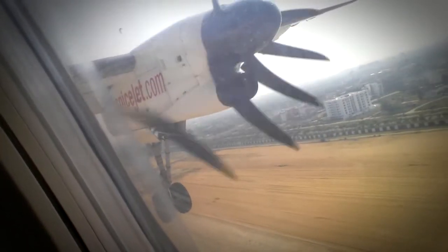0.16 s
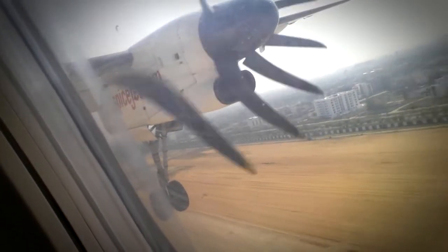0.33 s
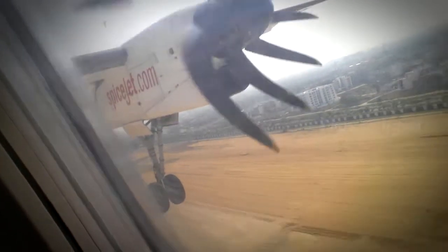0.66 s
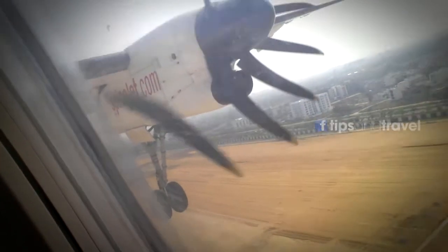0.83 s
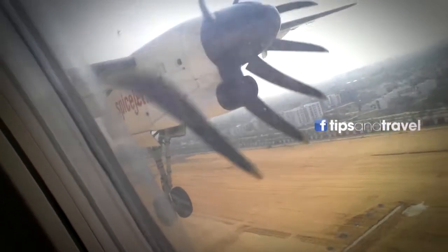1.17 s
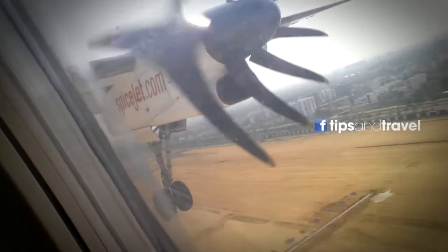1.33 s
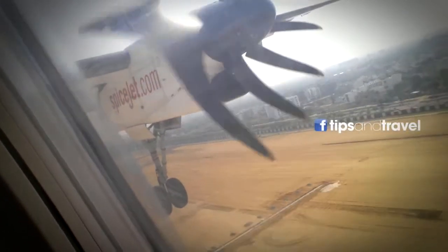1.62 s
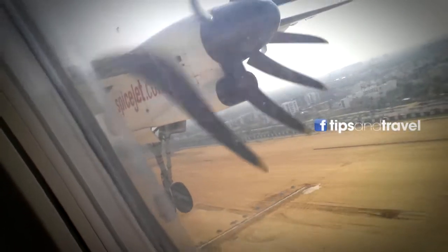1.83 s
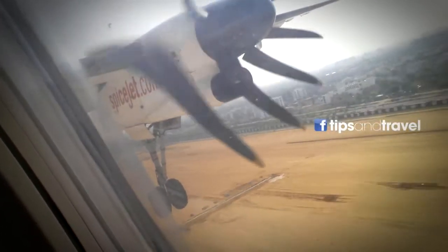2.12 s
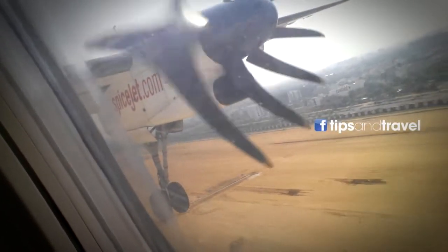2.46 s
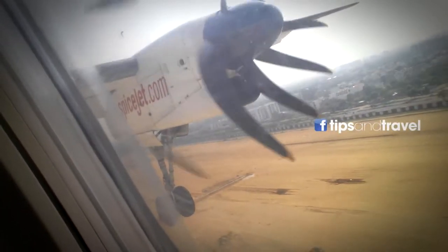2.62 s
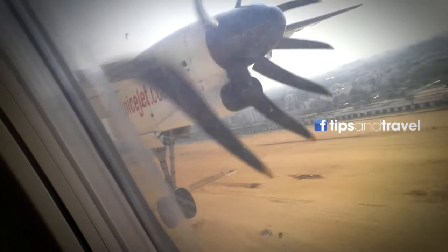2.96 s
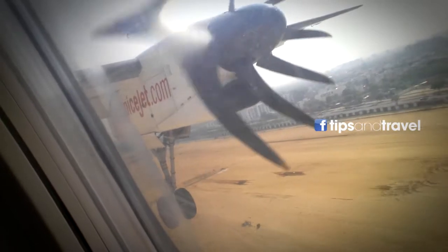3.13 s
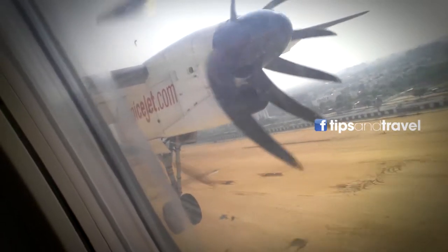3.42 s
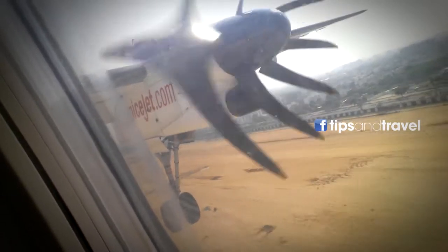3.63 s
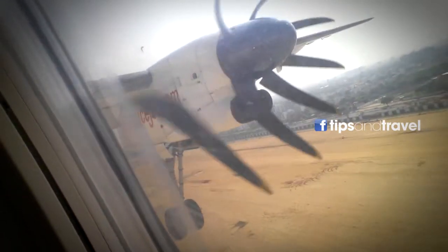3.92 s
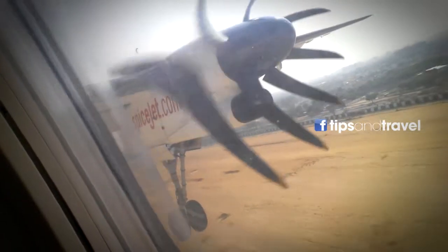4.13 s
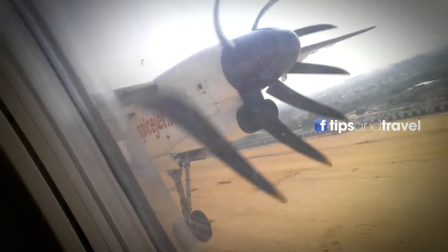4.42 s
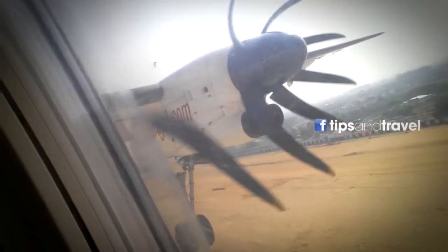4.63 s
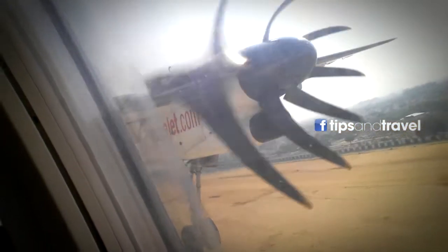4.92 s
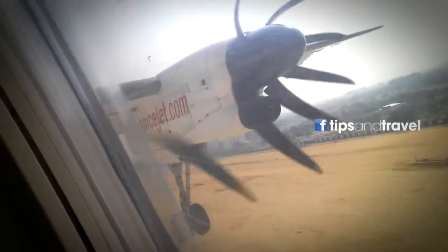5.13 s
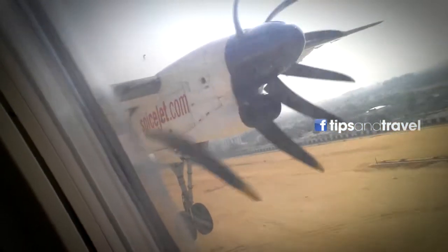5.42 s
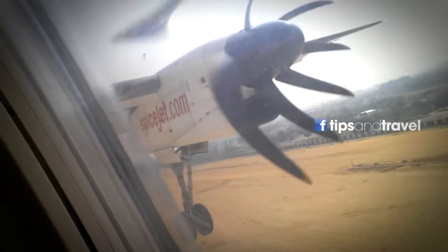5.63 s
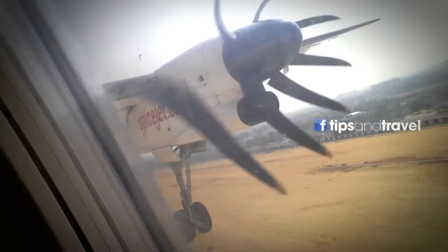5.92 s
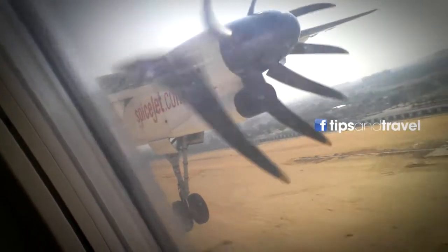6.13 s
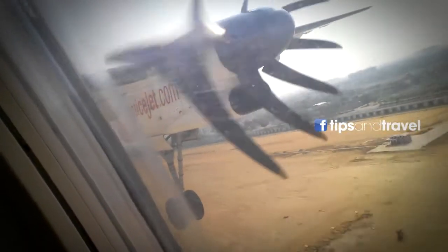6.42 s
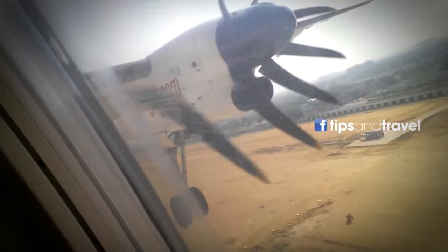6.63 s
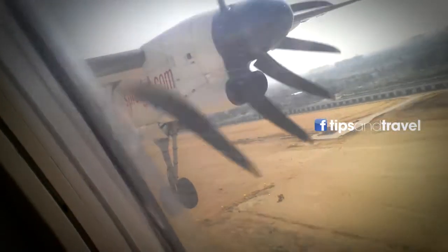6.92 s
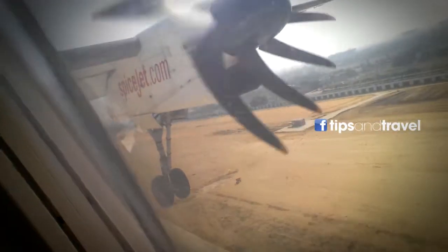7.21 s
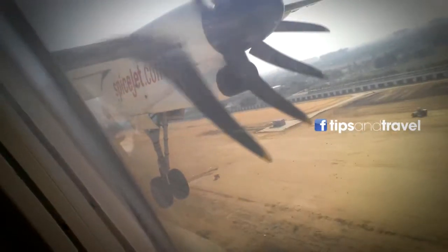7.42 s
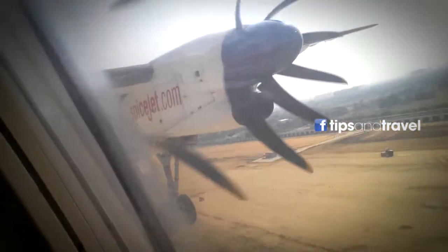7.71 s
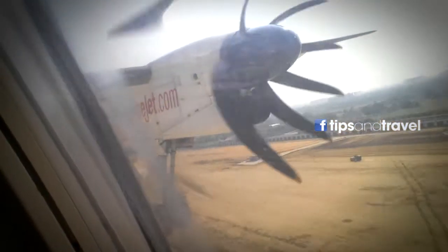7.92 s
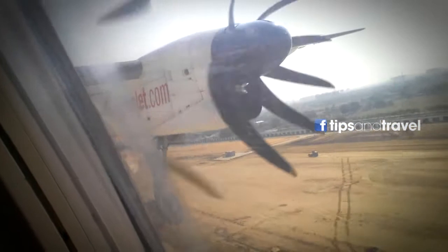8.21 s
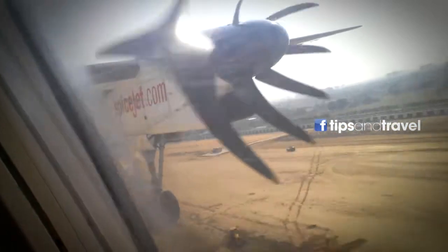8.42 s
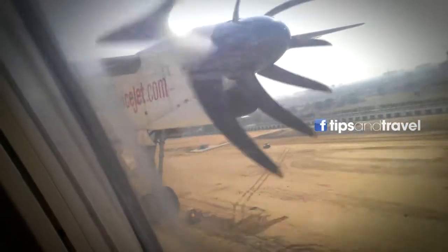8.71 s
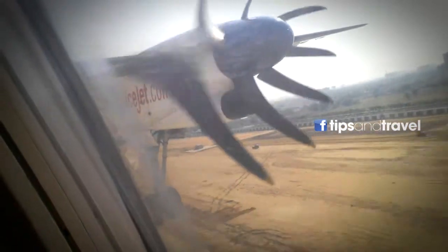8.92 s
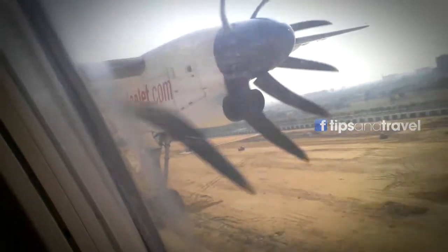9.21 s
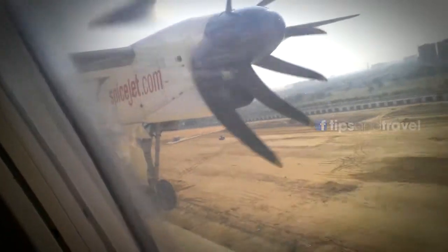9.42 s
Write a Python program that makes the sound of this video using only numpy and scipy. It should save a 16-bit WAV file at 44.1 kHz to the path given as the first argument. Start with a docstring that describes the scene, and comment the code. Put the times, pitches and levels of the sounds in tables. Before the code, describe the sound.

From 0 s, the inside of a turboprop cabin near a window: a loud, very deep propeller drone at about a hundred hertz, with fainter wavering hums, low hull rumble and muffled rushing air. High above runs a thin, piercing turbine whine around six kilohertz, roughened by the blade beat and leaning right, with fine hiss. A faint rub passes near 1.7 s and a tiny tick at 2.9 s. From 4.3 s a second turbine's whine creeps up slightly in pitch. A click at 4.4 s and a tight cluster of hard plastic taps at 4.9-5.2 s come from handling the camera. Around 6-7 s the drone dips and flutters, and the whine becomes smoother and fuller. After a tap at 6.6 s, grainy, buzzing rubs against trim run from 6.7 to 7.3 s with stronger air. The drone then recovers and continues, weakening at 9.5 s without stopping.

```python
"""Propeller blades beat on the hull of a turboprop, heard from the cabin with a hand-held camera at the window.
The beat is steady sines that drift in level and phase, with overtones, a gear tone and wavering hums.
Two turbines whine above it as tones chopped at each blade pass; one engine spools up towards the other.
The camera ticks as cracks that ring its case, and brushes the trim as grainy, buzzing noise.
Behind lie low rumble, air rush and hiss, all shaped stereo noise."""
import sys
import numpy as np
from scipy import signal
from scipy.fft import rfft, irfft, next_fast_len
from scipy.io import wavfile
from scipy.ndimage import uniform_filter1d, map_coordinates

SR = 44100
rng = np.random.default_rng(int(sys.argv[2]) if len(sys.argv) > 2 else 0)


def master_out(mix):
    """Clip the mix to full scale and print it as 16-bit PCM to the path in sys.argv[1]."""
    frames = np.transpose(np.atleast_2d(mix))
    ceiling = np.clip(frames, -1, 1)
    pcm = np.round(ceiling * 32767).astype(np.int16)
    wavfile.write(sys.argv[1], SR, pcm)


N = 421596
NOW = np.arange(N) / SR  # time of each sample, s
BLADE_HZ = 102.0  # blade passes a second
SPOOL_START_S = 4.3  # the far engine begins to spool up
TURN_START_S, TURN_END_S = 5.75, 6.75  # the camera turns a little from the window


def amp(db):
    """Decibels to an amplitude factor."""
    return 10 ** (np.asarray(db) / 20)


def unit(x):
    """Scale to rms 1."""
    return x / np.sqrt(np.mean(x ** 2) + 1e-20)


def along(points, hz):
    """Interpolate (Hz, value) points on a log frequency axis."""
    point_hz, value = np.transpose(points)
    return np.interp(np.log(hz + 1), np.log(point_hz + 1), value)


def curve(rows):
    """Interpolate (s, value) rows to one value per sample."""
    s, value = np.transpose(rows)
    return np.interp(NOW, s, value)


def turned(before, after):
    """A value that glides from before to after while the camera turns."""
    return np.interp(NOW, [TURN_START_S, TURN_END_S], [before, after])


def swell(centre_s, half_s):
    """A bell-shaped rise to 1, down to 1/e at half_s from its centre."""
    return np.exp(-((NOW - centre_s) / half_s) ** 2)


def wobble(rate):
    """A smooth random curve, rate knots a second."""
    coarse = np.arange(0, N + 32, 32)
    knots = rng.standard_normal(int(N * rate / SR) + 4)
    return np.interp(np.arange(N), coarse, map_coordinates(knots, [coarse * rate / SR]))


def gliding_sine(hz):
    """A sine that follows a frequency curve by summing its phase."""
    return np.sin(2 * np.pi * np.cumsum(hz) / SR)


def filtered(x, response):
    """Multiply the spectrum of x by a response of frequency."""
    m = next_fast_len(N + 8192)
    return irfft(rfft(x, m) * response(np.fft.rfftfreq(m, 1 / SR)), m)[..., :N]


def coloured(spectrum):
    """Gain of a (Hz, dB) spectrum, shut outside its ends."""
    return lambda hz: amp(along(spectrum, hz)) * (hz > spectrum[0][0]) * (hz < spectrum[-1][0])


def patches(shape, bins, frames):
    """A smooth random field over frequency and time, rms 1."""
    across_hz = uniform_filter1d(rng.standard_normal(shape), bins, -2)
    return unit(uniform_filter1d(across_hz, frames, -1))


def rush(spectrum, patchy_db):
    """Stereo noise of one colour with patches of random gain, its left-right mean at rms 1."""
    # how alike the two microphones hear noise: hz, correlation
    likeness = [(30, .999), (100, .975), (260, .94), (370, .88), (530, .74), (760, .72), (1090, .02),
                (1560, -.26), (2240, 0), (6650, -.1), (9500, 0)]
    # balance of the two microphones: hz, left_minus_right_db
    lean = [(190, 1.4), (440, 2), (590, -3), (1050, -4), (1390, -.5), (1860, 2), (3290, .5), (4370, -1),
            (5820, -6.5), (7750, -11), (10300, -19.5), (12500, -10)]
    z = signal.stft(rng.standard_normal((2, N), dtype=np.float32), nperseg=512)[2]
    gain = amp(patchy_db * patches(z.shape[1:], bins=6, frames=14))
    pair = signal.istft(z * gain, nperseg=512)[1]
    m = next_fast_len(N + 8192)
    hz = np.fft.rfftfreq(m, 1 / SR)
    # mid and side shares that give the wanted correlation
    angle = np.arccos(along(likeness, hz)) / 2
    mid, side = rfft(pair, m) * coloured(spectrum)(hz) * [np.cos(angle), np.sin(angle)]
    balance = amp(along(lean, hz) * [[.5], [-.5]])
    both = irfft([mid + side, mid - side] * balance, m)[:, :N]
    return both / np.std(both.mean(0))


def propeller():
    """Blade passes and hums as sines; turbulence lets level and phase drift."""
    # blade tone as the camera moves through the cabin's standing wave: time_s, level_db
    blade_levels = [(0, -12), (.7, -10), (1.5, -10.5), (2.1, -9), (3.6, -13), (4.1, -12), (4.35, -11.5),
                    (4.85, -8), (5.4, -10), (6.0, -14.5), (6.2, -20), (6.5, -12.5), (6.78, -20.5),
                    (7.3, -11), (7.5, -15.5), (8.25, -9), (9.35, -10), (9.56, -19)]
    # higher blade harmonics: multiple of the blade rate, level_db
    overtones = [(3, -37), (4, -45), (5, -49), (6, -50)]
    # a wavering low hum: time_s, level_db
    hum_levels = [(0, -27), (1.2, -28.5), (3.3, -36), (3.8, -29.5), (5, -39), (7.3, -31.5), (9, -27.5),
                  (9.56, -37)]
    # fainter wavering hums, one swell each: pitch_hz, level_db, swell_s, half_length_s, swell_gain_db
    drones = [(309.3, -46.5, 6.85, 0.15, 18), (338.5, -39, 4, 1, 1.5), (581.6, -47.5, 8.2, 1.6, 4),
              (720, -52.5, 2.4, 1.2, 2), (817, -58.5, 5.8, 1.1, 10.5)]
    gear_hz, hum_hz = 963.6, 182
    phase = 2 * np.pi * BLADE_HZ * NOW + 0.58 * wobble(1.5)
    tone = amp(curve(blade_levels) + 0.66 * wobble(7)) * np.sin(phase)
    second_db = -31 + 9.3 * swell(6.37, half_s=0.53)
    tone += amp(second_db + 2.7 * wobble(4)) * np.sin(2 * phase + 0.48 * wobble(2.46))
    for multiple, db in overtones:
        tone += amp(db + 2.7 * wobble(3.4)) * np.sin(multiple * phase + 1.02 * wobble(3))
    # the gear tone steps down when the far engine starts to spool up
    gear_db = np.where(NOW < SPOOL_START_S, -52.5, -57.5)
    tone += amp(gear_db + 1.2 * wobble(3.4)) * np.sin(2 * np.pi * gear_hz * NOW)
    tone += amp(curve(hum_levels) + 2.5 * wobble(2.1)) * gliding_sine(hum_hz + 2.59 * wobble(3))
    for hz, db, swell_s, half_s, gain_db in drones:
        drone_db = db + gain_db * swell(swell_s, half_s) + 3 * wobble(2.3)
        tone += amp(drone_db) * gliding_sine(hz + 7 * wobble(5))
    # the two microphones sit a little apart in the wave
    apart = round(.00012 * SR)
    pair = np.array([np.roll(tone, apart), np.roll(tone, -apart)])
    return np.sqrt(2) * pair * amp([[.75], [-.75]])


def comb(hz, passed, sharp, fade_db, drift):
    """A turbine tone chopped at each blade pass; each line has a slowly changing path to each microphone."""
    # a sharp of 0 leaves the tone whole; towards 1 it leaves only a narrow pulse per blade pass
    chop = (1 - sharp ** 2) / (1 - 2 * sharp * np.cos(2 * np.pi * BLADE_HZ * NOW) + sharp ** 2)
    tone = gliding_sine(hz + .7 * wobble(5))
    bins, _, z = signal.stft(chop * tone, SR, nperseg=2048)
    gain = coloured(passed)(bins)
    used = gain > 0
    z = z[used] * gain[used, None]
    # the window delays the side lines, which turns part of the chopping into a flutter of pitch
    lines_away = (bins[used, None] - hz.mean()) / BLADE_HZ
    z = z * np.exp(1j * .8 * lines_away ** 2)
    shape = (2,) + z.shape
    fade = amp(fade_db * patches(shape, bins=3, frames=25))
    path = fade * np.exp(1j * drift * patches(shape, bins=3, frames=70))
    heard = np.zeros((2, len(bins), z.shape[1]), np.complex64)
    heard[:, used] = z * path
    pair = signal.istft(heard, nperseg=2048)[1][:, :N]
    return pair / np.std(pair, axis=1, keepdims=True)


def turbines():
    """Whine of both engines as chopped tones, louder at the right microphone, which faces the window."""
    # near engine: time_s, pitch_hz
    near_pitch = [(0, 6309), (6.4, 6314.5), (9.56, 6315)]
    # near whine and upper comb: time_s, level_db
    near_levels = [(0, -37.5), (4.1, -36), (4.6, -43.5), (5.2, -37.5), (6.3, -37.5), (6.6, -43.5),
                   (6.85, -33.5), (7.3, -39.5), (9.56, -36.5)]
    upper_levels = [(0, -47.5), (6.05, -48), (6.3, -57), (6.9, -56), (7.2, -50.5), (9.56, -51.5)]
    # what window and microphone pass of each comb: hz, gain_db
    near_pass = [(4900, -60), (5250, -20), (5900, -16), (6010, -17), (6110, -9), (6210, -2.5), (6310, -1),
                 (6425, -1), (6505, -17), (6850, -17), (7250, -19), (7600, -60)]
    far_pass = [(5300, -34.5), (5700, -9), (6100, 2.5), (6280, 0), (6420, -8.5), (6600, -2), (7000, -5),
                (7400, -31)]
    upper_pass = [(6900, -30), (7250, -6), (7550, -8), (7800, 2.5), (7950, 2), (8150, -2), (8450, 3.5),
                  (8650, -5), (9100, -14), (9400, -45)]
    overtone_pass = [(11500, -31.5), (12100, -8.5), (12550, -8), (12750, -2), (13000, -29.5), (13300, -52)]
    # hiss around the overtone: hz, density_db_per_hz
    fizz_spectrum = [(10000, -31), (11000, -13), (11900, -9.5), (12550, -2.5), (12800, -7), (13050, -11.5),
                     (13400, -38)]
    far_from_hz, far_to_hz, spool_lag_s = 6257.5, 6306, .92
    near, near_db = curve(near_pitch), curve(near_levels)
    spooled = 1 - np.exp(-np.maximum(NOW - SPOOL_START_S, 0) / spool_lag_s)
    far = far_from_hz + (far_to_hz - far_from_hz) * spooled
    # after the turn the blades chop the near whine less deeply
    deep = comb(near, near_pass, sharp=.82, fade_db=1.2, drift=1.1)
    light = comb(near, near_pass, sharp=.45, fade_db=1.2, drift=1.1)
    angle = turned(0, np.pi / 2)
    core = amp(near_db) * (np.cos(angle) * deep + np.sin(angle) * light)
    # the far whine swings with the near one, the overtone and its fizz half as far
    swing_db = near_db - near_db.mean()
    far_db = turned(-62, -41.5) + swing_db
    core += amp(far_db) * comb(far, far_pass, sharp=.55, fade_db=1.1, drift=1.1)
    upper = amp(curve(upper_levels)) * comb(far, upper_pass, sharp=.95, fade_db=4.5, drift=1.2)
    overtone_db = turned(-59.5, -58) + .5 * swing_db
    overtone = amp(overtone_db) * comb(2 * far, overtone_pass, sharp=0.87, fade_db=-0.5, drift=2.5)
    fizz_db = turned(-64, -58) + .5 * swing_db + 1.5 * wobble(14)
    fizz = amp(fizz_db) * rush(fizz_spectrum, patchy_db=6.5)
    pan_db = turned(-8.5, -6) + 2.5 * wobble(2.5)  # left minus right
    core = core * amp(pan_db * [[.5], [-.5]])
    return core + upper * amp([[-10], [4]]) + overtone * amp([[-7], [3.5]]) + fizz


def ticks():
    """Taps on the camera: short noise cracks that ring the damped modes of its plastic case."""
    # taps: start_s, level_db, centre_hz, t60_s, treble_db, left_minus_right_db
    taps = [(2.893, -35, 3800, .02, -14, 0), (4.448, -27, 2700, .028, -1, .5),
            (4.8735, -29.5, 1600, .03, 1, -2), (4.883, -31, 4200, .03, -10, 0),
            (4.926, -35, 2300, .025, -8, 3), (4.9395, -23.5, 1950, .07, -6, 5),
            (4.957, -34, 3100, .06, -6, 3), (5.06, -32.5, 1900, .028, 3, -1),
            (5.071, -33.5, 1800, .035, -4, 0), (5.216, -46, 4200, .012, 10, 0),
            (5.8195, -32, 2300, .04, -10, -2), (6.6085, -34, 4000, .04, 4, 0)]
    # modes of the case: pitch_hz, level_db, t60_s
    modes = [(1420, -2, 0.09), (1715, 4, 0.11), (1995, 7, .06), (2350, -2, .04), (2800, 2, .035),
             (3214, -1, .07), (3800, -4, .03), (4200, -1, .04)]
    crack_gain, ring_gain, rise_s = 1.6, .47, 0.0008
    out = np.zeros((2, N + SR))
    t = np.arange(SR // 8) / SR
    for s, db, hz, t60, treble_db, pan_db in taps:
        ring = np.zeros(len(t))
        for mode_hz, mode_db, mode_t60 in modes:
            # a blow rings mostly the modes near its own centre, no longer than the hand's grip lets it
            off_db = 12 * abs(np.log2(mode_hz / hz))
            decay_db = -60 * t / min(mode_t60, t60)
            ring += amp(mode_db - off_db + decay_db) * np.sin(2 * np.pi * mode_hz * t)
        noise = rng.standard_normal((2, 2, len(t)))
        crack_band = signal.butter(2, [hz * .5, hz * 1.6], "band", fs=SR, output="sos")
        snap_band = signal.butter(2, [2200, 10000], "band", fs=SR, output="sos")
        crack = signal.sosfilt(crack_band, noise[0])
        snap = signal.sosfilt(snap_band, noise[1])
        burst = (crack_gain * crack + amp(treble_db) * snap) * amp(-60 * t / t60)
        blow = (ring_gain * ring + burst) * (1 - np.exp(-t / rise_s))
        start = round(s * SR)
        out[:, start:start + len(t)] += amp(db + pan_db * np.array([[.5], [-.5]])) * blow
    return out[:, :N]


def brushes():
    """The case rubs the shaking window trim: grainy hiss plus a rattle of noise hits at the blade rate."""
    # rubs: centre_s, length_s, level_db, rattle_over_hiss_db, tilt_db_per_octave
    rubs = [(1.72, .14, -49, -6, 1), (6.712, .025, -43, 3.5, -6), (6.762, 0.042, -42, 1, -1),
            (6.809, 0.049, -43, 2, -1), (6.865, .12, -35.5, -6, -2), (7.04, .12, -42, -5, -10),
            (7.167, 0.12, -38, -9.5, -2.5)]
    # colour of the rattle and of the rubbed surface: hz, density_db_per_hz
    rattle_spectrum = [(1500, -32), (2200, -6), (2800, -1), (3500, -14), (5000, -4.5), (6000, -7),
                       (7600, -14), (8700, -3), (9600, -15), (12500, -26), (13300, -51)]
    skin_spectrum = [(450, -30), (650, -14), (1100, -5), (1800, -2), (2250, -8), (2750, 1), (3100, 0),
                     (3500, -9), (5000, -8), (6500, -16), (8700, -12), (12000, -25), (13300, -50)]
    hit_t60_s, hit_place, tilt_hz = .012, .45, 2900  # place as a share of the blade cycle; tilt pivot
    out = np.zeros((2, N))
    # the trim hits the case once for each blade pass
    since_hit_s = ((BLADE_HZ * NOW - hit_place) % 1) / BLADE_HZ
    hits = unit(amp(-60 * since_hit_s / hit_t60_s) * rng.standard_normal((2, N)))
    rattle = unit(filtered(hits, coloured(rattle_spectrum)))
    grain, noise = amp(1.3 * wobble(80)), rng.standard_normal((2, N))
    for s, length, db, rattle_db, tilt_db in rubs:
        span = slice(round((s - length) * SR), round((s + length) * SR))
        size = span.stop - span.start
        hz = np.fft.rfftfreq(size, 1 / SR)
        colour = coloured(skin_spectrum)(hz) * amp(tilt_db * np.log2((hz + 1) / tilt_hz))
        hiss = unit(irfft(rfft(noise[:, span]) * colour, size))
        stroke = amp(db) * np.exp(-((NOW[span] - s) / length * 2) ** 4)
        out[:, span] += stroke * grain[span] * (hiss + amp(rattle_db) * rattle[:, span])
    return out


def air():
    """Hull rumble, rush of the boundary layer and turbine hiss as noise, the hiss pulsing with the blades."""
    # level of the rush, which rumble and hiss follow: time_s, level_db
    air_levels = [(0, -34), (1.45, -35.5), (1.8, -33.5), (2.3, -35), (4, -33.5), (4.45, -33.5), (4.68, -36),
                  (4.9, -33.5), (5.2, -34), (5.7, -33.5), (6.2, -32), (6.6, -33), (6.86, -30.5),
                  (6.95, -31.5), (7.18, -28.5), (7.32, -31.5), (7.9, -33.5), (9.56, -34)]
    # colour of each layer: hz, density_db_per_hz
    rumble_spectrum = [(18, -51.5), (32, -18), (50, -13.5), (72, 0.5), (88, -4), (102, 5), (120, -3.5),
                       (140, -6), (165, -8.5), (182, -10), (196, -10), (255, -12), (300, -9), (322, -16),
                       (342, -14.5), (420, -21.5), (520, -46.5)]
    rush_spectrum = [(330, -35), (430, -1), (555, -6), (582, -1.5), (680, -7.5), (725, -6.5), (835, -7),
                     (930, -14.5), (1150, -14.5), (1350, -16), (2000, -19.5), (2600, -23), (3600, -25),
                     (5200, -24.5), (6200, -29.5)]
    hiss_spectrum = [(4800, -35), (5500, -13), (5900, -8), (6100, -0.5), (6260, -5), (6440, 3), (6560, -12),
                     (6720, -9.5), (7300, -14), (8200, -14.5), (8700, -18), (9300, -24), (10300, -31.5),
                     (11300, -38), (12500, -52.5)]
    rush_db = curve(air_levels)
    mean_db = rush_db.mean()
    gust_db = .85 * wobble(12)
    beat = 1 + 0.081 * np.sin(2 * np.pi * BLADE_HZ * NOW)
    # the rumble makes only part of the rush's swings
    rumble_db = mean_db + 19 + 0.63 * (rush_db - mean_db)
    rumble = amp(rumble_db) * rush(rumble_spectrum, patchy_db=0.0)
    flow = amp(rush_db + gust_db) * rush(rush_spectrum, patchy_db=0.99)
    hiss_db = rush_db - 10 + turned(1.5, -2.5) + gust_db + .8 * wobble(14)
    hiss = amp(hiss_db) * beat * rush(hiss_spectrum, patchy_db=1.1)
    return rumble + flow + hiss


def scene():
    """Everything that reaches the two microphones."""
    return propeller() + turbines() + ticks() + brushes() + air()


def record(dry):
    """Gain control eases the level down as the power rises, peaks round off, and the top of the band is cut."""
    top_hz = 13600
    power = np.abs(uniform_filter1d(np.mean(dry ** 2, 0), round(.04 * SR))) + 1e-3
    held = dry * (power / amp(-15.0)) ** -.08
    soft = held / (1 + np.abs(held / .98) ** 10) ** (1 / 10)
    return filtered(soft, lambda hz: hz < top_hz)


dry = scene()
out = record(dry)
master_out(out)
```